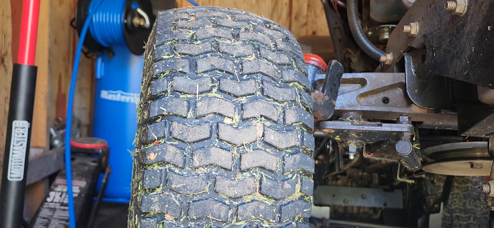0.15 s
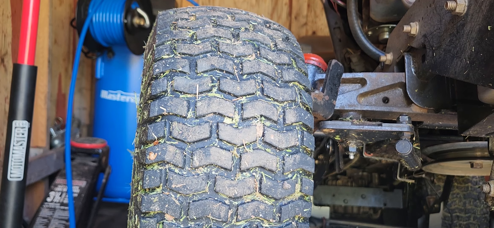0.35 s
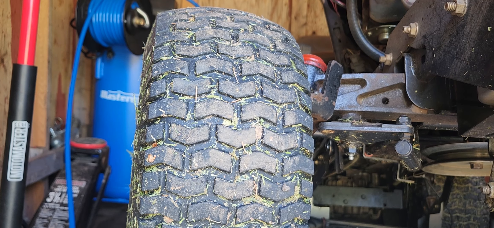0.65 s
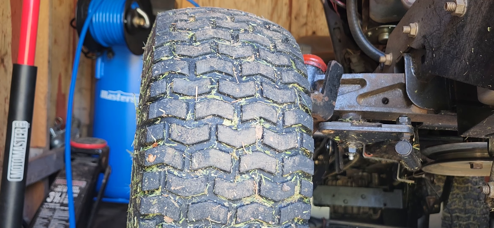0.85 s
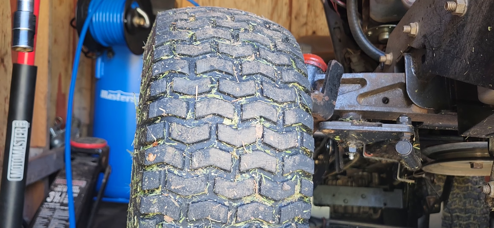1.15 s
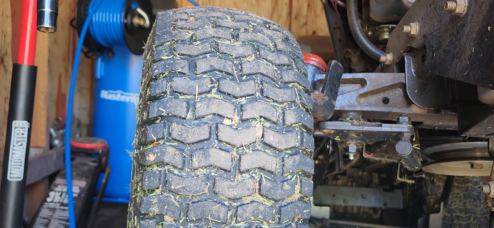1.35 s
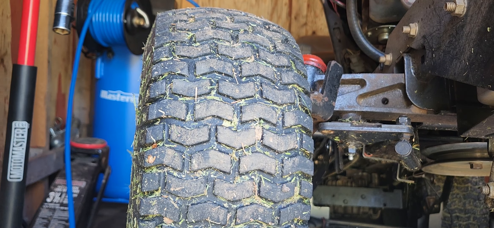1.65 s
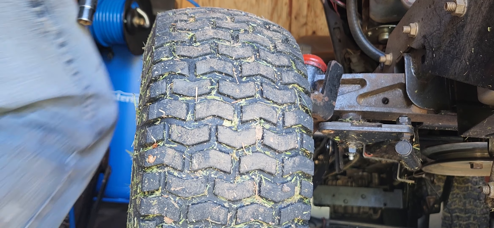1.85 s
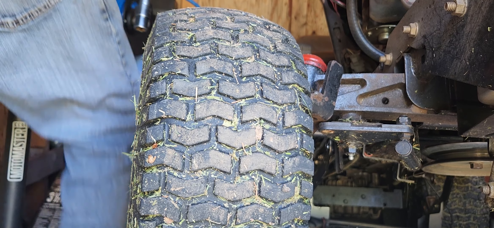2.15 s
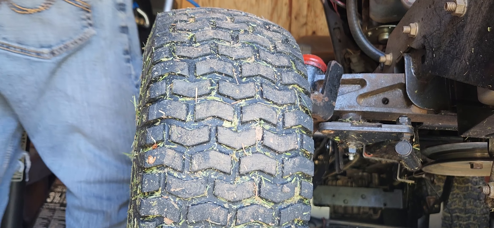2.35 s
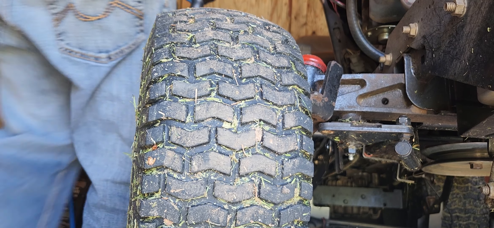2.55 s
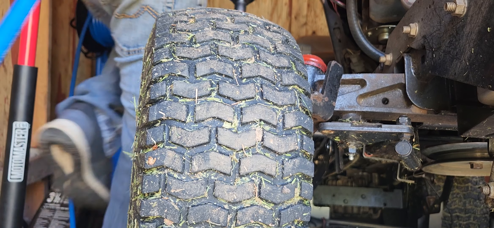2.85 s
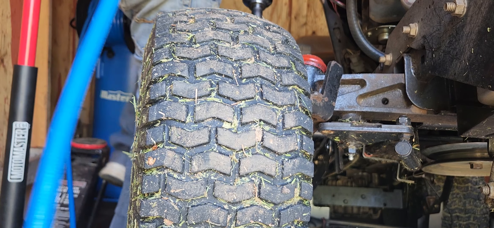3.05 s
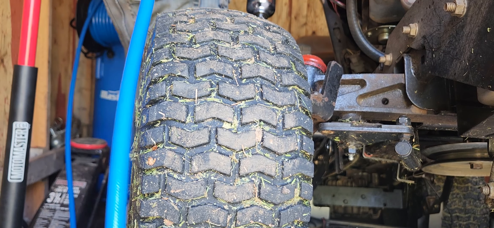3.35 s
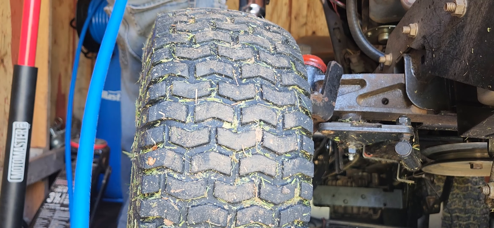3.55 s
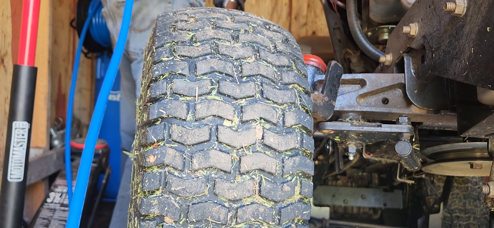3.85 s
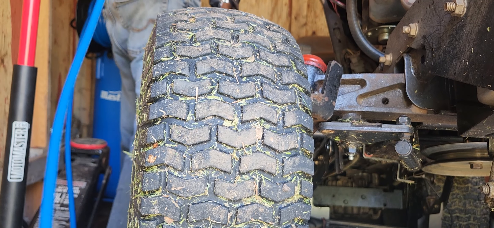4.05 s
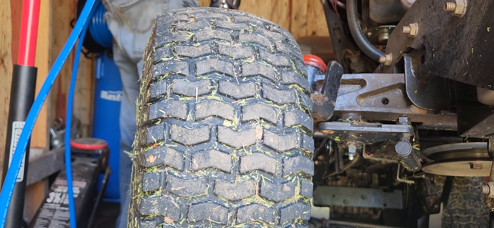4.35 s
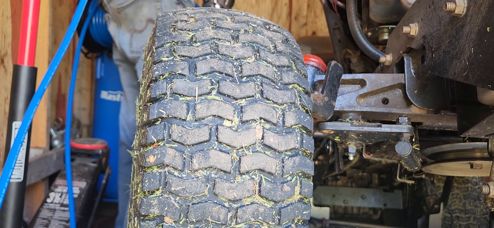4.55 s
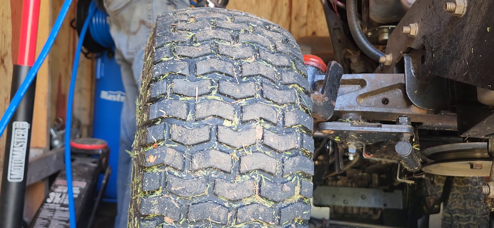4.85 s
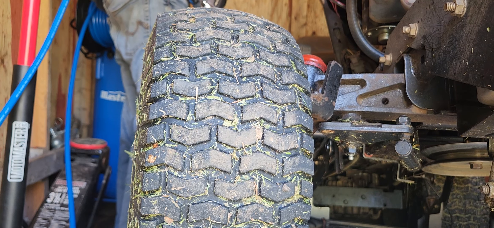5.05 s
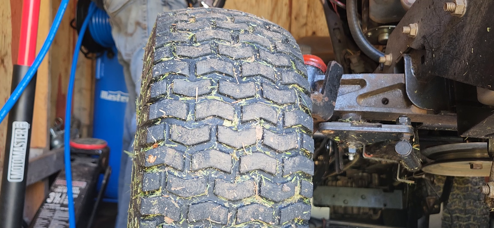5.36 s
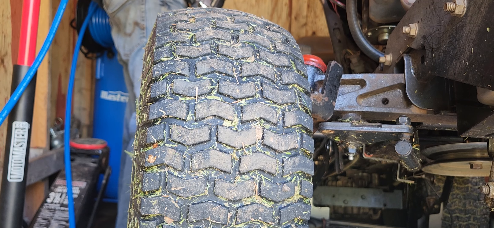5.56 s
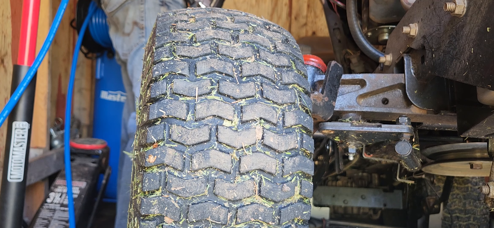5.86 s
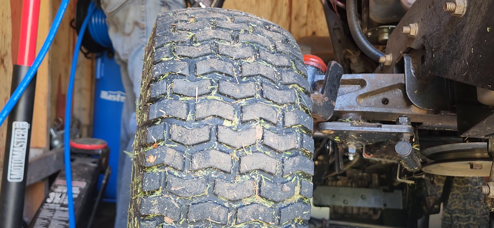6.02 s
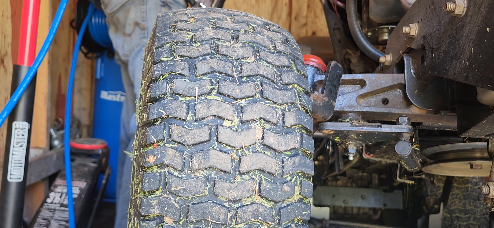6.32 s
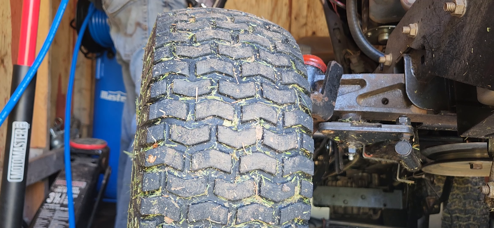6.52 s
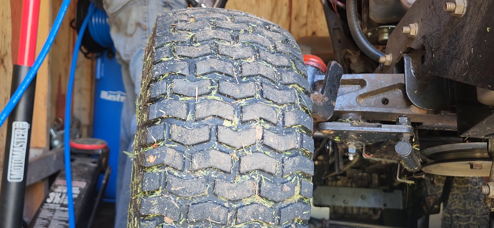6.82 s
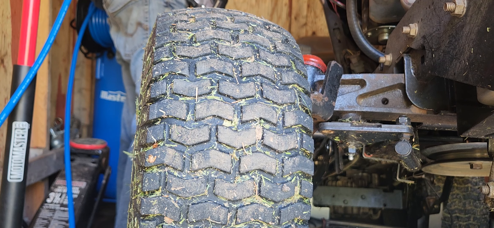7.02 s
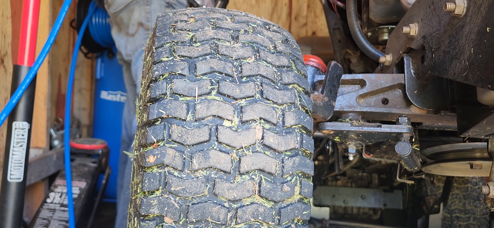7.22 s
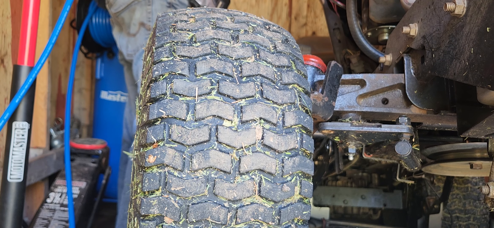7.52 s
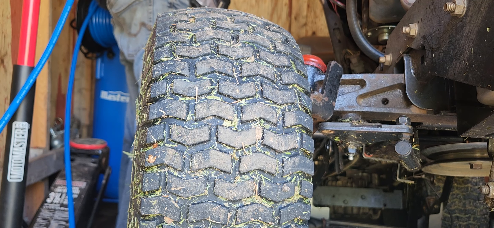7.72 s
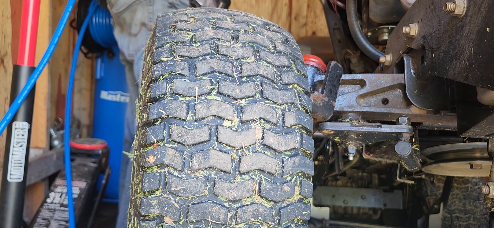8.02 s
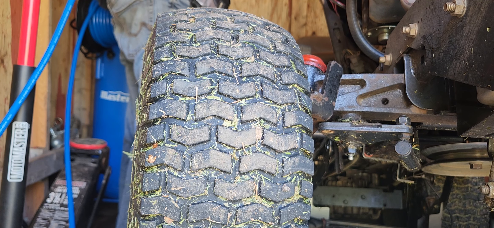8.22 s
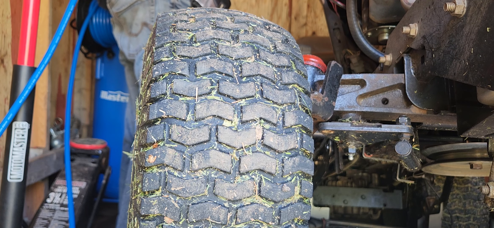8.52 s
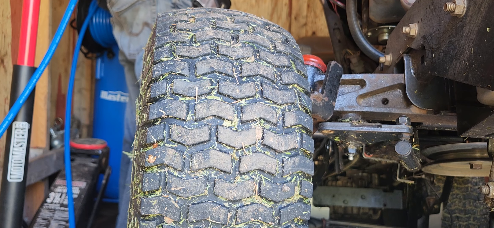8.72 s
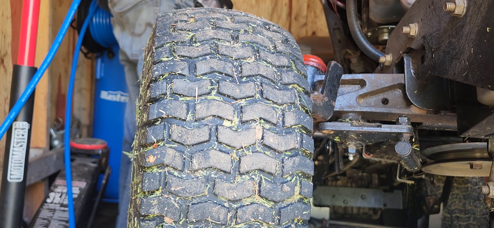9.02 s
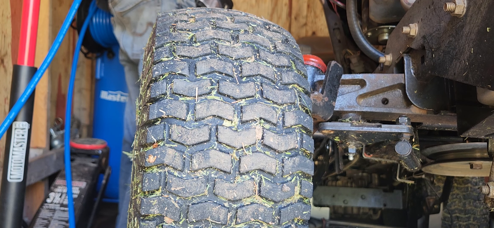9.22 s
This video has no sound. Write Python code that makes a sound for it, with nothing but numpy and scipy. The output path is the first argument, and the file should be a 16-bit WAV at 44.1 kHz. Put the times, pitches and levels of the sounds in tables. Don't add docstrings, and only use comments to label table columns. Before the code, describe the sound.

In a small wooden shed, pressurised air hisses loudly and very brightly from a hose coupling, slightly left, with a faint high whistle inside it. Heavy low footsteps and gear thud and scrape on planks, and a sharp metal click snaps early. After about seven seconds the valve shuts quickly, leaving faint seeping air, tiny clicks and distant traffic rumble. Close stereo phone microphone.

```python
import sys
import numpy as np
from scipy import signal
from scipy.fft import irfft, next_fast_len
from scipy.io import wavfile
from scipy.ndimage import uniform_filter1d

SR = 44100
rng = np.random.default_rng(int(sys.argv[2]) if len(sys.argv) > 2 else 0)


def attenuation_scalar(level_db):
    decades = np.asarray(level_db, float) / 20
    return 10 ** decades


def log_audio(samples):
    frames = np.atleast_2d(samples).T
    limited = np.clip(frames, -1, 1)
    pcm = np.round(limited * 32767).astype(np.int16)
    wavfile.write(sys.argv[1], SR, pcm)


N = 413738
M = next_fast_len(N, True)
T = np.arange(N) / SR
F = np.fft.rfftfreq(M, 1 / SR)
WIDE = np.array([[1], [-1]])
PORT_LAG = 8


def level(x):
    return x / np.sqrt(np.mean(x ** 2))


def curve(table):
    s, value = np.transpose(table)
    return np.interp(T, s, value)


def after(s):
    return np.maximum(T - s, 0)


def slope(points):
    hz, db = np.transpose(points)
    return attenuation_scalar(np.interp(np.log(F + 1), np.log(hz), db))


def bump(hz, width_hz):
    return 1 / np.sqrt(1 + (2 * (F - hz) / width_hz) ** 2)


def between(lo_hz, hi_hz):
    return 1 / np.sqrt((1 + (lo_hz / (F + 1)) ** 6) * (1 + (F / hi_hz) ** 6))


def walk(rate_hz):
    hold = int(SR / rate_hz)
    steps = np.repeat(rng.standard_normal(N // hold + 1), hold)
    return 1.2 * uniform_filter1d(uniform_filter1d(steps, hold), hold)[:N]


def noise(gain, flicker_db=0., rate_hz=10):
    re, im = rng.standard_normal((2, len(F)))
    coloured = irfft((re + 1j * im) * gain, M)[:N]
    return level(coloured * attenuation_scalar(flicker_db * walk(rate_hz)))


def ports(x, lag):
    return np.array([x, np.roll(x, lag)])


def shed(x, wet_db, t60_s, lag=PORT_LAG):
    first_echo_s = 0.0054
    t = np.arange(int(.26 * SR)) / SR
    echoes = rng.standard_normal((2, len(t))) * attenuation_scalar(-60 * t / t60_s) * np.clip(t / first_echo_s - .5, 0, 1)
    echoes = echoes / np.sqrt(np.sum(echoes ** 2, axis=1, keepdims=True))
    return ports(x, lag) + attenuation_scalar(wet_db) * signal.oaconvolve(x[None], echoes, axes=1)[:, :N]


def drifting_shed(parts, wet_db, t60_s, rate_hz):
    shares = attenuation_scalar(3.5 * np.array([walk(rate_hz) for _ in parts]))
    lags = PORT_LAG + 3 * np.arange(len(parts)) - 4
    heard = sum(shed(part * share, wet_db, t60_s, lag) for part, share, lag in zip(parts, shares, lags))
    return heard / np.sqrt(uniform_filter1d(heard ** 2, SR // 2, axis=1))


# nearest in seconds, reach in seconds, rumble, tyre roar, tyre hiss in dB.
VEHICLES = [
    (-.02, 0.1, -70, -49, -58),
    (5.4, 0.73, -60, -77, -52),
    (7.9, 1.0, -46, -70, -75),
    (9.5, 0.41, -43, -41, -40),
]
TOWN_DB = (-55, -61, -60.5)


def traffic():
    power = attenuation_scalar(np.array(TOWN_DB))[:, None] ** 2
    for s, reach_s, *db in VEHICLES:
        power = power + attenuation_scalar(np.array(db))[:, None] ** 2 / (1 + ((T - s) / reach_s) ** 2)
    return 10 * np.log10(power)


# frequency in Hz, density in dB per Hz.
RUMBLE_COLOUR = [(7.1, -58), (12, -34), (27, -17), (42, -10), (65, 7.5), (102, -9), (126, -9.5), (147, -24),
                 (231, -19.5), (286, -29.5), (381, -30.5), (450, -46), (580, -52), (990, -120)]
# frequency in Hz, density in dB per Hz.
TYRE_COLOUR = [(53, -30), (90, -20), (118, -3), (144, -8.5), (227, -12), (268, -16.5), (363, -15.5),
               (467, -16.5), (643, -13), (842, -11.5), (947, -16.5), (1120, -12), (1680, -13),
               (3180, -24.5), (5000, -30), (6500, -56), (11000, -120)]
# frequency in Hz, width in Hz, level in dB.
TREAD_MODES = [(375, 40, -1), (657, 60, 4), (960, 100, 7), (1550, 200, 4)]


def road():
    rumble_db, roar_db, hiss_db = traffic()
    middle, side = [noise(slope(RUMBLE_COLOUR), flicker_db=2.5, rate_hz=7) for _ in range(2)]
    out = attenuation_scalar(rumble_db + 4.5) * (middle + attenuation_scalar(-24.5) * WIDE * side)
    tread = slope(TYRE_COLOUR) * (1 + sum(attenuation_scalar(db) * bump(hz, w) ** 2 for hz, w, db in TREAD_MODES))
    bands = ((roar_db - 3.5, 90, 450, -12), (roar_db, 450, 1250, -4), (hiss_db - 9.0, 1250, 1900, -4))
    for db, lo_hz, hi_hz, side_db in bands:
        door, around = (noise(tread * between(lo_hz, hi_hz), flicker_db=1.15, rate_hz=6) for _ in range(2))
        out = out + attenuation_scalar(db) * (ports(door, PORT_LAG) + attenuation_scalar(side_db) * WIDE * around)
    top = slope(TYRE_COLOUR) * between(1380, 7500)
    return out + attenuation_scalar(hiss_db - 5.0) * np.array([noise(top, flicker_db=2.0, rate_hz=6.7) for _ in WIDE])


# start in seconds, length in seconds, level in dB.
HUM_SPELLS = [
    (0.058, 0.47, -61.5),
    (1.08, .62, -63.5),
    (2.25, 0.4, -67),
    (3.58, 1.5, -63.5),
    (5.5, 0.56, -65.5),
    (6.6, 1.05, -69),
]


def tank():
    hum_hz, rest_db, fade_s = 229, -72.5, 0.14
    turns = np.cumsum(hum_hz * (1 + .006 * walk(9))) / SR
    loud = attenuation_scalar(rest_db)
    for s, length_s, db in HUM_SPELLS:
        loud = loud + attenuation_scalar(db) * np.clip(np.minimum(T - s, s + length_s - T) / fade_s + .5, 0, 1)
    return loud * attenuation_scalar(2.0 + 1.5 * walk(8)) * np.sin(2 * np.pi * turns)


# start in seconds, length in seconds, level in dB, grit in dB re level.
FLOOR_DRAGS = [(0, .28, -51, -16), (0.553, 0.086, -43, -5), (0.921, 0.04, -35.5, -9.5),
               (1.174, .06, -49, -18), (1.66, 0.044, -37.5, -11), (1.771, 0.037, -46.5, -10),
               (1.956, .025, -49, 4), (2.325, 0.043, -37, -34), (2.52, 0.21, -52, -11),
               (2.9, .11, -52, -11), (3.166, 0.059, -41, -7), (3.85, .045, -43, -13),
               (3.913, 0.073, -37, -7.5), (6.132, 0.038, -44.5, 7)]


def drags():
    bite_s, fall_db_per_s, grit_fall_db_per_s = 0.01, 243, 66
    rasp, grit = np.zeros((2, N))
    for s, length_s, db, grit_db in FLOOR_DRAGS:
        rub = np.clip(after(s) / bite_s, 0, 1) * attenuation_scalar(db - fall_db_per_s * after(s + length_s))
        rasp = rasp + rub * attenuation_scalar(-4.0)
        grit = grit + rub * attenuation_scalar(grit_db - 6.5 - grit_fall_db_per_s * after(s))
    rasp = rasp * noise(between(71, 460) * (1 + bump(140, 170)), flicker_db=2.0, rate_hz=110)
    grit = grit * noise(between(550, 1300) + .45 * between(1300, 3400), flicker_db=3.0, rate_hz=150)
    return shed(rasp, wet_db=-10.0, t60_s=0.23) + shed(grit, wet_db=4.5, t60_s=0.13)


# start in seconds, peak in dB, plank pitch in Hz, knock in dB re peak.
BLOWS = [(0.302, -19.5, 101.2, -15), (0.362, -24.5, 88.5, -23), (0.405, -20, 106.3, -28),
         (0.964, -25, 108, -23), (1.122, -24, 103, -12), (1.15, -27, 115.5, -4), (1.239, -44, 61.9, -5.5),
         (1.422, -22.5, 109.5, -13.5), (1.484, -31.5, 113, -17), (1.549, -34, 112, -10),
         (1.619, -33, 91.4, -16), (1.674, -31.5, 102.5, -4.5), (2.321, -26.5, 111, -7.5),
         (2.33, -32, 194, -19), (2.344, -24.5, 102.8, -32), (2.599, -41.5, 140, -17), (2.92, -52, 63.5, -8),
         (3.511, -21.5, 173, -5), (3.516, -31, 270, -20), (3.534, -16.5, 80.8, -14.5),
         (3.564, -32, 64.6, -13), (3.628, -35, 93, -24.5), (3.699, -45, 86.1, -4), (3.964, -29, 165, -15),
         (4.059, -34, 69, -13.5), (4.948, -47, 67, -11), (6.158, -38, 170, -13), (6.199, -38, 61, -18)]
# start in seconds, level in dB.
MORE_SCUFFS = [(.964, -60), (1.122, -48), (1.549, -49.5), (1.619, -52), (1.674, -46.5), (2.321, -56),
               (2.599, -57), (3.511, -36.5), (3.699, -51), (3.19, -52), (3.925, -47), (3.964, -57),
               (4.948, -57), (6.149, -42), (6.195, -45)]
# start in seconds, peak in dB, pitch in Hz, T60 in seconds.
FLOOR_FLEXES = [
    (.31, -43, 40, .4),
    (2.34, -35, 37.3, 0.82),
    (3.53, -26, 36, 0.58),
    (3.97, -33, 38, .4),
]


def thumps():
    push_s, push_cycles, contact_s = 0.022, 3.2, 0.026
    tail_db, plank_t60_s, scuff_db = -5.5, 0.38, -38
    boom, knock, scuff = np.zeros((3, N + SR))
    t = np.arange(SR) / SR
    touch = np.exp(-(t / contact_s) ** 1.37) * (1 - np.exp(-t / 0.0012))
    for s, db, hz, knock_db in BLOWS:
        i = int(s * SR)
        push = np.exp(-(t / min(push_s, push_cycles / hz)) ** 2)
        swing = (1 - np.exp(-t / 0.0071)) * (push + attenuation_scalar(tail_db - 60 * t / plank_t60_s))
        turn = 2 * np.pi * hz * t
        plank = np.sin(turn) + 0.1 * np.sin(0.64 * turn) + 0.27 * np.sin(1.3 * turn)
        boom[i:i + SR] += attenuation_scalar(db) * swing * plank
        knock[i:i + SR] += attenuation_scalar(db + knock_db - 3.0) * (touch + attenuation_scalar(-16 - 60 * t / .5))
        scuff[i:i + SR] += attenuation_scalar(db + knock_db + scuff_db) * touch
    for s, db in MORE_SCUFFS:
        i = int(s * SR)
        scuff[i:i + SR] += attenuation_scalar(db - 1.5) * touch
    for s, db, hz, t60_s in FLOOR_FLEXES:
        i = int(s * SR)
        boom[i:i + SR] += attenuation_scalar(db - 60 * t / t60_s) * (1 - np.exp(-t / 0.035)) * np.sin(2 * np.pi * hz * t)
    knock = knock[:N] * noise(between(110, 565) * (1 + 2.25 * bump(285, 59)), flicker_db=4.5, rate_hz=120)
    scuff_colour = between(550, 1300) + .45 * between(1300, 3200)
    scuff = scuff[:N] * noise(scuff_colour, flicker_db=3.0, rate_hz=200)
    out = boom[:N] * attenuation_scalar(.6 * WIDE)
    return out + shed(knock, wet_db=-6.5, t60_s=0.12) + shed(scuff, wet_db=3.5, t60_s=0.12)


# start in seconds, peak in dB.
METAL_CLICKS = [(0.7109, -16), (0.72, -36), (1.143, -29), (1.151, -45), (1.5548, -42), (1.6186, -41),
                (5.8675, -36), (5.9992, -33.5), (7.4225, -44), (7.8898, -48), (7.9194, -44)]
# frequency in Hz, width in Hz, level in dB.
COLLAR_MODES = [(1280, 250, -16), (2750, 500, -7), (3350, 600, -2), (3850, 600, 0), (4600, 800, -4),
                (5400, 900, -6)]


def clicks():
    rise_s, delay_s = .001, .0012
    out = np.zeros(N + SR)
    t = np.arange(SR // 10) / SR
    crack = np.zeros(len(t))
    for k, (hz, width_hz, db) in enumerate(COLLAR_MODES):
        crack += (-1) ** k * attenuation_scalar(db) * np.sin(2 * np.pi * hz * t) * np.exp(-np.pi * width_hz * t)
    snap = crack * (1 - np.exp(-t / rise_s))
    snap = snap / np.max(np.abs(snap))
    for s, db in METAL_CLICKS:
        i = int((s + delay_s) * SR)
        out[i:i + len(t)] += attenuation_scalar(db + 3) * snap
    return shed(out[:N], wet_db=-2, t60_s=.19, lag=3) * attenuation_scalar(1.7 * WIDE)


# start in seconds, peak in dB.
GRIP_SHIFTS = [
    (7.5, -61.5),
    (7.93, -55.5),
    (8.46, -56.5),
]


def gap_open():
    rest_db, open_s, fall_db_per_s = -66.5, .16, 19
    gap = attenuation_scalar(rest_db)
    for s, db in GRIP_SHIFTS:
        gap = gap + np.clip(after(s) / open_s, 0, 1) * attenuation_scalar(db - fall_db_per_s * after(s + open_s))
    return gap


# frequency in Hz, density in dB per Hz.
GAP_COLOUR = [(2060, -40), (3500, -26), (3800, -28), (4900, -4), (5330, 2.5), (6090, -29), (7320, -6),
              (8050, -4), (9140, 0.5), (10900, -7.5), (13300, -1.5), (15100, -2), (16000, -8.5)]
# frequency in Hz, width in Hz, level in dB.
GAP_MODES = [(5200, 150, 0), (7460, 200, 1), (9430, 300, 4), (11500, 150, 4), (12900, 200, 1),
             (14100, 300, 0)]


def seep():
    colour = slope(GAP_COLOUR) * (1 + sum(attenuation_scalar(db - 6) * bump(hz, w) ** 2 for hz, w, db in GAP_MODES))
    hiss = drifting_shed([noise(colour) for _ in range(3)], wet_db=5.0, t60_s=0.046, rate_hz=2.6)
    hiss = hiss * gap_open() * attenuation_scalar(4.0) * np.clip((T - 7.03) / 0.11, 0, 1)
    last = sum(bump(hz, 200) ** 2 for hz in (6300, 10600, 14300))
    dying = attenuation_scalar(-71) * (T > 7.06) * np.clip((7.55 - T) / .15, 0, 1)
    return hiss + np.array([noise(last), noise(last)]) * dying


# time in seconds, level in dB.
JET_LEVEL = [
    (0, -32.5),
    (1.0, -34),
    (1.9, -33),
    (1.97, -34.5),
    (2.6, -33.5),
    (4.0, -34),
    (5.2, -33.5),
    (5.9, -33),
    (6.1, -32.5),
]
# time in seconds, share of raised resonances 0-1.
TOOL_PRESS = [
    (0, 0),
    (5.8, 0),
    (6.4, .9),
    (9.38, .9),
]


def flow():
    narrows_s, narrow_db_per_s, shuts_s, shut_db_per_s = 6.91, 42, 7.035, 400
    fall_db = narrow_db_per_s * after(narrows_s) + shut_db_per_s * after(shuts_s)
    held_db = np.minimum(fall_db, 25)
    whistle_db = -12 + 0.54 * held_db
    shoulder_db = -10.5 + .25 * held_db
    return curve(JET_LEVEL) - fall_db, whistle_db, shoulder_db, 3.4 + 1.6 * curve(TOOL_PRESS)


# frequency in Hz, density in dB per Hz.
JET_COLOUR = [(880, -57), (1500, -24), (2080, -20), (2660, -22), (3030, -20.5), (5660, -14), (6240, -14),
              (6500, -8.5), (6890, -14.5), (9100, -18.5), (10100, -11), (12000, -10), (13100, -3),
              (14800, -6.5), (16000, -10.5)]
# frequency in Hz, width in Hz, level in dB.
CAVITY_MODES = [(13270, 420, 6.5), (13820, 350, -3), (14400, 300, 5.5), (10330, 80, 5), (10970, 50, 7),
                (12590, 50, 4), (12890, 40, 4), (13160, 50, 3), (13280, 50, 4), (13420, 45, 4),
                (14335, 55, 4)]


def cavities(rise):
    modes = [1 + (attenuation_scalar(db) - 1) * bump(hz * rise, w) ** 2 for hz, w, db in CAVITY_MODES]
    return slope(JET_COLOUR) * np.prod(modes, axis=0)


# frequency in Hz, width in Hz, level in dB.
WHISTLE_MODES = [(6280, 130, 0), (6185, 60, -5), (6220, 550, -9), (5360, 400, -17), (7450, 300, -19)]


def leak():
    jet_db, whistle_db, shoulder_db, left_db = flow()
    press = curve(TOOL_PRESS)
    dull_db = -2.2 * press
    loose, tight = cavities(1), cavities(1.012)
    top, low = between(12000, 20000), between(8500, 12000)
    whistle_colour = sum(attenuation_scalar(db) * bump(hz, w) ** 2 for hz, w, db in WHISTLE_MODES)
    body_colour = slope(JET_COLOUR) * between(1300, 7640)
    streams = []
    for _ in range(4):
        hiss = np.sqrt(1 - press) * noise(loose * top, flicker_db=.9, rate_hz=30)
        hiss += np.sqrt(press) * noise(tight * top, flicker_db=.9, rate_hz=30)
        shoulder = noise(loose * low, flicker_db=-1.5, rate_hz=9.1)
        whistle = noise(whistle_colour, flicker_db=1.75, rate_hz=32)
        body = noise(body_colour, flicker_db=1.84, rate_hz=3.5)
        hiss += attenuation_scalar(shoulder_db + dull_db - 1.0) * shoulder
        hiss += attenuation_scalar(whistle_db + dull_db - 1.23) * whistle
        hiss += attenuation_scalar(dull_db - 13.5) * body
        streams.append(hiss)
    heard = drifting_shed(streams, wet_db=7.5, t60_s=0.065, rate_hz=0.7)
    return heard * attenuation_scalar(jet_db + WIDE * left_db / 2 + 3.5)


def scene():
    return road() + tank() + drags() + thumps() + clicks() + seep() + leak()


def roll_off(x):
    return signal.sosfilt(signal.butter(12, 17070, fs=SR, output="sos"), x)


def record(dry):
    hiss = attenuation_scalar(-62.0) * np.array([noise(between(2400, 5200)) for _ in dry])
    top_cut = signal.ellip(14, .2, 90, 15720, fs=SR, output="sos")
    mix = signal.sosfilt(top_cut, dry + hiss)
    return roll_off(mix)


dry = scene()
out = record(dry)
log_audio(out)
```